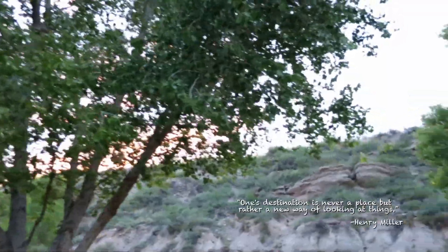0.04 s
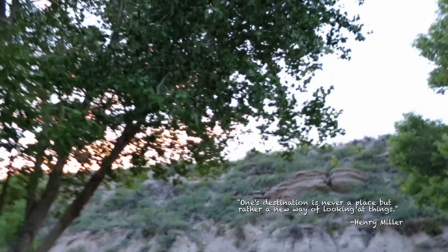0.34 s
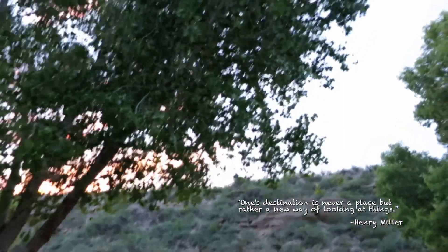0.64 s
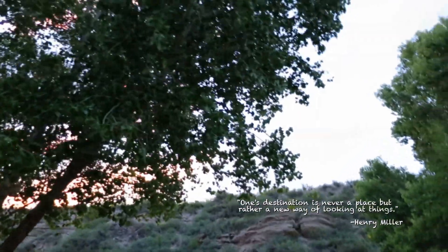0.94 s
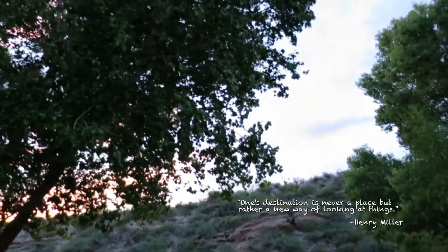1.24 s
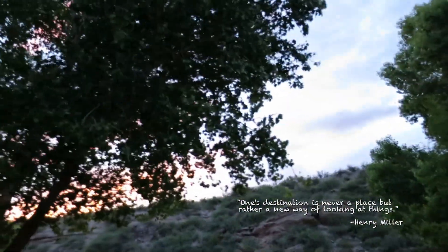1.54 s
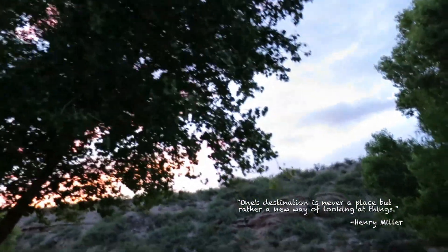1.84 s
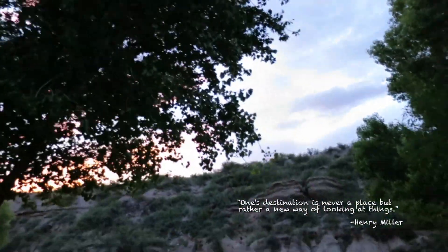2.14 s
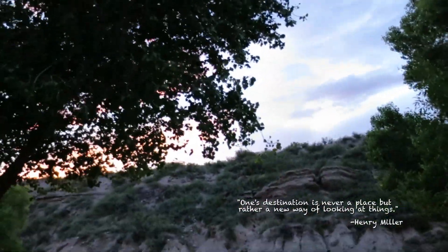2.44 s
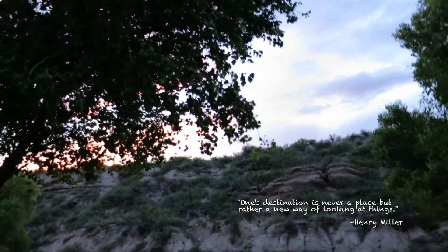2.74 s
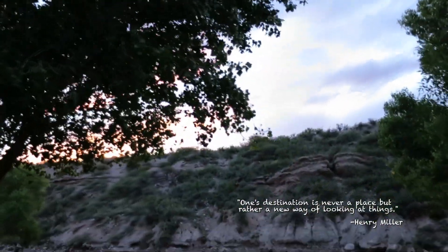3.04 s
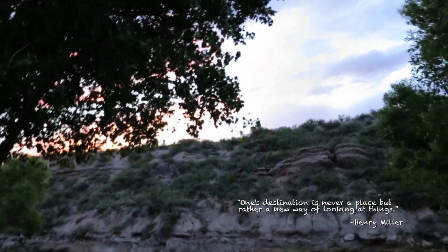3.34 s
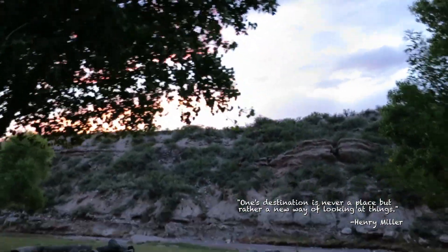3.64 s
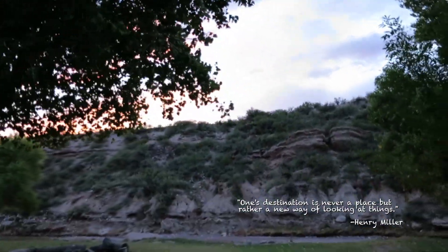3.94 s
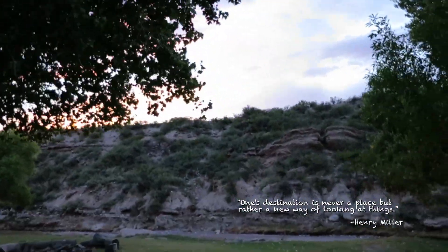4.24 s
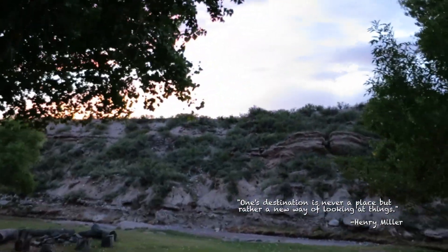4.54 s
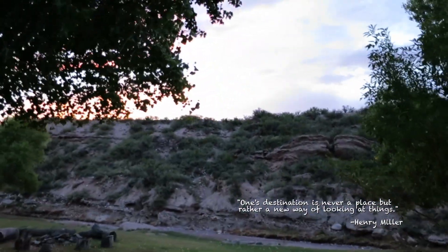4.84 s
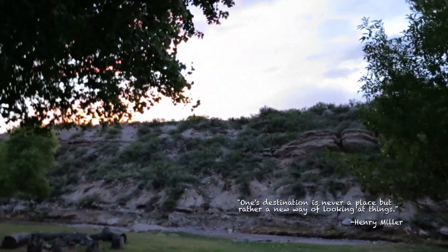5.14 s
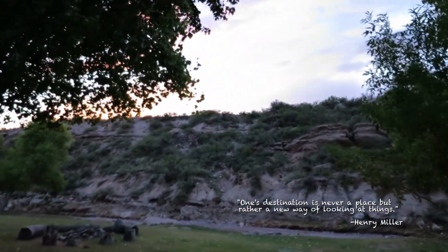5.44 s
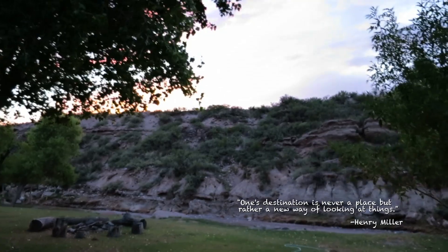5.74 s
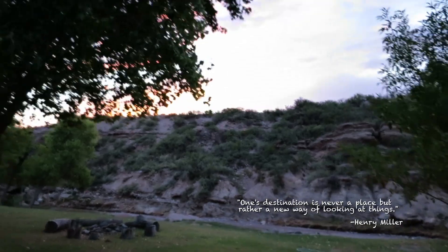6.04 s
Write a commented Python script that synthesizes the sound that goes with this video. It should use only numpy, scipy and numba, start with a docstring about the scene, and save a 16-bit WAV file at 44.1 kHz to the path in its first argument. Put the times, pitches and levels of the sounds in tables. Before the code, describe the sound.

Gusts of wind buffet the microphone over a steady hiss of leaves and distant water, with small handling clicks and rubs.

```python
"""Gusts on a hand-held camera by a creek.

Cottonwood leaves and distant water hiss at dusk. Gusts buffet the two microphone ports;
the strongest makes the limiter duck everything for most of a second and latches the wind filter,
so later gusts are thinner and central. Fingers shift on the plastic case: clicks, rubs, one squeak."""
import sys
import numpy as np
from scipy import signal
from scipy.fft import rfft, irfft
from scipy.io import wavfile
from scipy.ndimage import uniform_filter1d, minimum_filter1d
from numba import njit

SR = 44100
rng = np.random.default_rng(int(sys.argv[2]) if len(sys.argv) > 2 else 0)


def log_audio(samples):
    """Write samples as a 16-bit WAV file to the path given in sys.argv[1]."""
    # one column per channel
    frames = np.atleast_2d(samples).T
    # limit to full scale, then quantise
    limited = np.clip(frames, -1, 1)
    pcm = np.round(limited * 32767).astype(np.int16)
    wavfile.write(sys.argv[1], SR, pcm)


N = 277830
TIME_S = np.arange(N) / SR

# Big eddies: start_s, length_s, peak_db, centre_hz
BUFFETS = [(1.149, 0.017, -35, 110), (1.311, 0.02, -23, 102), (1.382, 0.019, -18.5, 105),
           (1.418, .016, -15, 99), (1.492, .008, -22, 115), (1.535, .018, -22.5, 100),
           (1.595, 0.0089, -18, 115), (1.636, 0.011, -18, 100), (2.91, 0.038, -26, 88.5),
           (3.118, 0.005, -8.5, 174), (3.153, 0.023, -13.5, 233), (3.218, 0.0047, -17, 150),
           (3.292, 0.0045, -14, 159), (3.387, 0.012, -21, 100), (3.513, 0.027, -6.5, 116),
           (3.55, 0.0093, -3, 110), (3.562, 0.0068, -1, 101), (3.573, 0.0031, 4.5, 184),
           (3.74, 0.0064, -8.5, 150), (3.753, .016, -7.5, 131), (3.773, 0.005, 2.5, 170),
           (3.807, 0.004, -13.5, 150), (3.847, 0.0071, -12.5, 110), (3.873, 0.0052, -10, 199),
           (3.892, 0.019, -10, 149), (3.924, 0.0028, 9, 269), (3.93, 0.0074, -4, 654),
           (3.935, .034, 0.5, 235), (4.106, 0.031, -9.5, 273), (4.158, .003, -4.5, 486),
           (4.171, 0.0066, -9, 268), (4.191, 0.0072, -8, 250), (4.291, 0.013, -9.5, 235),
           (4.313, .013, 2, 428), (4.324, 0.013, 1, 755), (4.338, 0.0095, -2.5, 230),
           (4.372, 0.02, -11, 238), (4.414, 0.0045, -6.5, 192), (4.465, 0.0066, -8.5, 210),
           (4.479, 0.012, -7, 298), (4.501, 0.018, -10.5, 200), (4.542, 0.017, -12, 240),
           (4.609, 0.015, -24, 148), (4.749, 0.013, -26, 148), (4.786, 0.0095, -20, 178),
           (4.81, 0.014, -12, 235), (4.842, 0.011, -19.5, 256), (4.936, 0.012, -19.5, 150),
           (4.986, 0.02, -22, 182), (5.137, 0.013, -19.5, 140), (5.226, .006, -8, 201),
           (5.248, .018, -10, 255), (5.281, 0.025, -13, 263), (5.36, 0.0044, -9, 241),
           (5.386, 0.0077, -15.5, 200), (5.441, .007, -16.5, 150), (5.523, 0.0051, -13, 240),
           (5.544, .017, -13.5, 205), (5.702, 0.023, -14, 151), (5.773, .021, -22.5, 140),
           (5.853, 0.016, -17, 161), (5.89, .014, -22, 169), (6.015, 0.005, -16.5, 175),
           (6.04, 0.019, -25, 200), (6.099, 0.0039, -17.5, 210), (6.266, 0.0065, -7, 228)]
# Gusts at the ports: start_s, length_s, rumble_db, swirl_db, swirl_centre_hz
GUSTS = [(1.11, 0.072, -41, -45, 110), (1.34, 0.32, -37, -38.5, 105), (1.81, 0.88, -48, -55.5, 110),
         (2.855, 0.35, -38.5, -49, 110), (3.104, 0.32, -37.5, -48, 110), (3.53, 0.06, -23.5, -25, 110),
         (3.657, 0.32, -27, -26.5, 100), (4.14, 0.05, -40, -30, 224), (4.29, 0.24, -31.5, -32.5, 240),
         (4.791, .24, -37.5, -38, 207), (5.216, 0.17, -40, -32, 260), (5.5, 0.27, -34.5, -53, 170),
         (6.027, 0.34, -40, -38, 201)]
# One eddy: ratio_to_centre, gain_db
EDDY_SPECTRUM = [(.1, -20), (.3, -10), (.55, -2.5), (1, 0), (1.6, -9), (3, -26.5), (6, -43), (20, -49)]
# Damping by the port mesh: freq_hz, gain_db
MESH_RESPONSE = [(300, 4), (1500, 2), (2200, -14), (6000, -24)]
# Airflow rumble: freq_hz, gain_db
RUMBLE_SPECTRUM = [(20, -19), (45, 2.5), (85, 2.5), (140, -7.5), (220, -11), (330, -11), (500, -23),
                   (900, -25), (2500, -44)]
# Plastic parts slipping: start_s, peak_db, ring_hz, t60_s, left_minus_right_db
CLICKS = [(0.2572, -23, 810, 0.017, 0), (0.3878, -26.5, 890, 0.0062, 0), (0.5578, -17, 1640, 0.0017, -15),
          (.852, -29, 1600, 0.014, 0), (1.1756, -24.5, 2210, 0.018, 1), (1.222, -28, 1250, .012, 0),
          (1.4, -23, 1700, 0.0017, 5), (1.441, -15.5, 1420, 0.0027, -1), (1.5088, -19, 1730, 0.0055, -1),
          (1.529, -16.5, 1680, 0.0026, 0), (1.7938, -19.5, 620, 0.0026, 0), (1.839, -28, 1080, 0.017, 2),
          (1.94, -31, 1360, .008, 1), (2.3056, -9, 2010, 0.0013, -22), (2.3058, -9.5, 4770, 0.00094, 6),
          (2.539, -6.5, 1700, 0.0029, -1.5), (2.5695, -10, 1740, 0.0015, 0),
          (2.5751, -11, 1700, 0.0032, -1), (2.74, -28, 1110, 0.0086, 0), (2.971, -31, 700, 0.045, 0),
          (3.3563, -17.5, 2070, 0.00072, -1), (3.453, -26, 1330, .005, -8),
          (3.4615, -18.5, 1500, 0.0011, -14), (4.648, -17.5, 1340, 0.001, -4),
          (5.1739, -15.5, 2270, 0.0018, -2), (5.216, -24.5, 1150, 0.0061, 0), (6.146, -32.5, 890, 0.014, 0),
          (6.1727, -26, 1560, 0.015, 7), (6.239, -19.5, 1530, 0.0026, 0), (6.294, -18, 1980, 0.0024, 0)]
# Skin sliding on the case: start_s, length_s, level_db, left_minus_right_db
RUBS = [(0.576, 0.079, -39, -12), (1.828, 0.013, -34.5, -1), (2.284, 0.011, -34, -6),
        (2.352, 0.018, -34, -8), (2.376, 0.034, -29.5, -13), (2.413, 0.03, -38, -8),
        (3.056, 0.091, -38, -23), (3.086, 0.011, -41, -10), (3.151, 0.036, -30.5, -13),
        (3.19, 0.038, -32.5, -13), (3.29, 0.043, -35.5, -2), (3.419, 0.014, -33.5, -3),
        (3.47, 0.061, -36, -9), (3.739, 0.032, -28.5, -8), (4.353, 0.055, -34, -8),
        (4.417, 0.059, -30.5, -8), (4.481, 0.026, -37, -8), (4.792, 0.028, -33, -2),
        (4.865, 0.044, -40, -1), (5.19, 0.015, -43, 1), (5.212, .042, -40, -4), (5.325, 0.019, -37.5, -1),
        (5.383, .02, -35, -1), (5.461, 0.014, -41, 0), (5.508, 0.012, -34, 4), (6.176, 0.049, -42, 0)]
# Case resonances: freq_hz, gain_db
CASE_RESPONSE = [(150, -5), (500, -1), (1050, 6.5), (1400, 5), (2020, 7.5), (2380, -1.5), (3300, -2),
                 (4400, -12), (7000, -27), (14000, -54)]
# Dry ticks: start_s, peak_db
TICKS = [(1.173, -17.5), (2.425, -18.5), (2.547, -19), (3.691, -22.5), (4.699, -25)]
# Fingertip squeak: time_s, pitch_hz, level_db
SQUEAK_TRACK = [(1.645, 229, -60), (1.656, 291, -31.5), (1.672, 385, -30.5), (1.679, 527, -49),
                (1.684, 690, -31.5), (1.699, 755, -30.5), (1.704, 900, -60)]
# Leaves and creek, common to both ports: freq_hz, gain_db
HISS_MID_SPECTRUM = [(18, -38), (30, -5), (59, -3.5), (148, 1.5), (177, -3.5), (208, -1), (455, -1),
                     (830, -3), (996, -3.5), (1110, -3), (1260, -3.5), (3780, -4.5), (8500, -10.5),
                     (13300, -9.5), (15500, -21.5)]
# Leaves and creek, opposed between ports: freq_hz, gain_db
HISS_SIDE_SPECTRUM = [(18, -46), (30, -38), (81, -23), (180, -2), (467, 0.5), (561, -2), (787, -5),
                      (1020, -4.5), (1230, -4.5), (1680, -10.5), (2360, -14), (3590, -7), (12900, -5),
                      (15500, -6)]
# Hiss level, with an added dip as the limiter ducks after the big gust: time_s, level_db
HISS_LEVEL = [(0, -37), (1, -37.5), (2, -38.5), (3.4, -38), (4.05, -44.5), (4.3, -42), (4.6, -41),
              (4.95, -42.5), (5.25, -39), (5.7, -40), (6.3, -40.5)]


def buffets(width_ratio=0.44, ragged_db=2.5, size=8192):
    """Each big eddy sweeps a short, ragged pressure push across the ports."""
    out, t = np.zeros((2, N)), (np.arange(size) - size / 2) / SR
    knots_s = np.linspace(t[0], t[-1], size // 256)
    for start_s, length_s, peak_db, centre_hz in BUFFETS:
        flutter = undb(ragged_db * np.interp(t, knots_s, rng.standard_normal(len(knots_s))))
        bell = np.exp(-.5 * (t / (width_ratio * length_s)) ** 2)
        push = rng.standard_normal((2, size)) * flutter * bell
        push = colour(colour(push, EDDY_SPECTRUM, centre_hz), MESH_RESPONSE)
        push = across_ports(np.array([unit(row) for row in push]))
        add(out, start_s + length_s / 2 + t[0], push / abs(push).max() * undb(peak_db))
    return out


def wind_rumble(churn_db=0.5, churn_hz=32, lull_db=-61.5):
    """Turbulence at the ports, rising with each gust."""
    rumble = colour(across_ports(rng.standard_normal((2, N)), stray_db=-5.5), RUMBLE_SPECTRUM)
    gusts = sum(gust_envelope(start_s, length_s) * undb(db) for start_s, length_s, db, _, _ in GUSTS)
    return unit(rumble * undb(churn_db * walk(churn_hz))) * (undb(lull_db) + gusts)


def swirl(eddies_per_s=65.0, flutter_db=4.5):
    """Small eddies in each gust sputter against the mesh."""
    air = colour(across_ports(rng.standard_normal((2, N))), MESH_RESPONSE)
    flutter = undb(flutter_db * np.minimum(walk(eddies_per_s), .5))
    out = np.zeros((2, N))
    for start_s, length_s, _, level_db, centre_hz in GUSTS:
        eddies = unit(colour(air, EDDY_SPECTRUM, centre_hz) * flutter)
        out += eddies * gust_envelope(start_s, length_s) * undb(level_db)
    return out


def gust_envelope(start_s, length_s, attack_s=0.031, release_s=0.036):
    """Exponential rise, hold, exponential fall."""
    t = TIME_S - start_s
    return np.exp(np.minimum(t, 0) / attack_s - np.maximum(t - length_s, 0) / release_s)


def across_ports(pair, stray_db=-12.0, max_lag_rad=2.404, corner_hz=69):
    """Air meets the right port, then the left: one push out of phase, plus stray turbulence."""
    size = pair.shape[-1]
    lag_rad = max_lag_rad * (1 - np.exp(-np.fft.rfftfreq(size, 1 / SR) / corner_hz))
    turn = np.exp(.5j * np.array([-lag_rad, lag_rad]))
    return irfft(rfft(pair[0]) * turn + undb(stray_db) * rfft(pair[1]) * turn.conj(), size)


def case_clicks(contact_s=0.00076, body_db=-22.0, body_t60_s=0.093, size=2048):
    """A slip kicks the case: one part rings briefly, then the whole body dies away."""
    out, t = np.zeros((2, N)), np.arange(size) / SR
    for start_s, peak_db, ring_hz, t60_s, pan_db in CLICKS:
        onset = 1 - np.exp(-(t / contact_s) ** 2)
        envelope = onset * decay(t, t60_s)
        ring = np.sin(2 * np.pi * ring_hz * t) * envelope / envelope.max()
        body = unit(colour(rng.standard_normal(size), CASE_RESPONSE)) * onset * decay(t, body_t60_s)
        add(out, start_s, (ring + undb(body_db) * body) * undb(peak_db) * pan(pan_db))
    return out


def finger_rubs(slips_per_s=4500.0, rough_db=3.0, rough_hz=260, edge_s=0.023):
    """Skin sticks and slips in tiny uneven steps that excite the case."""
    slips = rng.standard_normal((2, N)) * (rng.random(N) < slips_per_s / SR)
    scrape = colour(mid_side(slips, side_db=-4.5), CASE_RESPONSE)
    scrape = unit(scrape * undb(rough_db * walk(rough_hz)))
    strokes = sum(swell(start_s, length_s, edge_s) * undb(level_db) * pan(pan_db)
                  for start_s, length_s, level_db, pan_db in RUBS)
    return scrape * strokes


def dry_ticks(t60_s=0.015, corner_hz=5500.0, size=2048):
    """Tiny treble bursts that die at once."""
    out, t = np.zeros((2, N)), np.arange(size) / SR
    for start_s, peak_db in TICKS:
        treble = colour(rng.standard_normal((2, size)), [(corner_hz / 2, -18), (corner_hz, 0)])
        tick = mid_side(treble * decay(t, t60_s), side_db=-1.5)
        add(out, start_s, tick / abs(tick).max() * undb(peak_db))
    return out


def finger_squeak():
    """Stick-slip speeds up as a fingertip lets go."""
    time_s, pitch_hz, level_db = np.transpose(SQUEAK_TRACK)
    cycles = np.cumsum(np.interp(TIME_S, time_s, pitch_hz)) / SR
    return np.sin(2 * np.pi * cycles) * np.interp(TIME_S, time_s, undb(level_db), left=0, right=0)


def grip(slips_per_s=32.0, level_db=-55.5, scatter_db=2.5):
    """The restless hand makes faint random ticks in the case."""
    slips = (rng.random(N) < slips_per_s / SR) * undb(scatter_db * rng.standard_normal(N))
    return unit(colour(slips, CASE_RESPONSE)) * undb(level_db)


def leaves_and_creek(flutter_db=1.23, flutter_hz=21.874, grain=0.43):
    """Countless leaf taps and splashes merge into hiss; each octave flutters on its own."""
    taps = rng.standard_normal((2, N)) * np.exp(grain * rng.standard_normal((2, N)))
    spectrum = rfft(taps)
    octave = np.log2(np.clip(np.fft.rfftfreq(N, 1 / SR), 125, 16000) / 125)
    common_db = 0.2 * walk(rate_hz=7.64)
    hiss = np.zeros((2, N))
    for k in range(8):
        band = irfft(spectrum * np.maximum(1 - abs(octave - k), 0), N)
        hiss += band * undb(flutter_db * walk(flutter_hz) + common_db)
    mid = unit(colour(hiss[0], HISS_MID_SPECTRUM))
    side = unit(colour(hiss[1], HISS_SIDE_SPECTRUM))
    level_db = np.interp(TIME_S, *np.transpose(HISS_LEVEL))
    return mid_side([mid, side], side_db=-1.5) * pan(0.5) * undb(level_db)


def undb(db):
    """Decibels to gain."""
    return 10 ** (np.asarray(db) / 20)


def unit(x):
    """Scale to rms 1."""
    return x / np.sqrt(np.mean(x ** 2))


def decay(t, t60_s):
    """Fall of 60 dB per t60_s."""
    return np.exp(-np.log(1000) * t / t60_s)


def colour(x, outline, freq_scale=1):
    """Filter by (freq_hz, gain_db) rows, frequencies scaled."""
    freq_hz, gain_db = np.transpose(outline)
    bins_hz = np.maximum(np.fft.rfftfreq(x.shape[-1], 1 / SR), 1)
    gain = undb(np.interp(np.log(bins_hz), np.log(freq_hz * freq_scale), gain_db))
    return irfft(rfft(x) * gain, x.shape[-1])


def walk(rate_hz):
    """Random steps, smoothed twice; rms 1."""
    hold = int(SR / rate_hz)
    steps = np.repeat(rng.standard_normal(N // hold + 1), hold)
    return unit(uniform_filter1d(uniform_filter1d(steps, hold), hold)[:N])


def pan(left_minus_right_db):
    """Constant-power stereo gains."""
    return unit(undb(np.array([[.5], [-.5]]) * left_minus_right_db))


def mid_side(pair, side_db=0):
    """Mid and side to left and right."""
    side = undb(side_db) * pair[1]
    return np.array([pair[0] + side, pair[0] - side])


def add(out, start_s, sound):
    """Mix in a stereo sound."""
    start = int(start_s * SR)
    part = sound[:, :max(N - start, 0)]
    out[:, start:start + part.shape[1]] += part


def swell(start_s, length_s, edge_s):
    """Gate with rounded edges."""
    rise = np.clip((TIME_S - start_s) / edge_s + .5, 0, 1)
    fall = np.clip((start_s + length_s - TIME_S) / edge_s + .5, 0, 1)
    return np.sin(np.pi / 2 * rise * fall) ** 2


@njit
def limiter_cut_db(over_db, recover_db_per_s):
    """Gain reduction: instant attack, steady recovery."""
    cut_db, held_db = np.empty(len(over_db)), 0.
    for i in range(len(over_db)):
        held_db = max(held_db - recover_db_per_s / SR, over_db[i], 0.)
        cut_db[i] = held_db
    return cut_db


def wind_filter(x, gain_db, trip_db=-8.5, open_hz=20.0, mid_hz=88.0, side_hz=1620.0,
                mid_glide_s=0.45, side_hz_per_s=2000.0):
    """Deep limiting latches a rising high-pass: bass thins and folds to mono."""
    latched_s = np.cumsum(np.maximum.accumulate(gain_db < trip_db)) / SR
    mid_corner_hz = open_hz * (mid_hz / open_hz) ** np.minimum(latched_s / mid_glide_s, 1)
    side_corner_hz = np.minimum(open_hz + side_hz_per_s * latched_s, side_hz)
    mid = zero_phase_high_pass((x[0] + x[1]) / 2, mid_corner_hz)
    side = zero_phase_high_pass((x[0] - x[1]) / 2, side_corner_hz)
    return mid_side([mid, side])


def zero_phase_high_pass(x, corner_hz):
    """Forwards, then backwards: the image stays centred."""
    forward = high_pass(x, corner_hz)
    return high_pass(forward[::-1].copy(), corner_hz[::-1].copy())[::-1]


@njit
def high_pass(x, corner_hz):
    """One pole, moving corner."""
    y, low = np.empty(len(x)), 0.
    for i in range(len(x)):
        g = np.tan(np.pi * corner_hz[i] / SR)
        step = (x[i] - low) * g / (1 + g)
        y[i] = x[i] - low - step
        low += 2 * step
    return y


def scene():
    """Open air, no echo: far hiss plus all that touches the camera."""
    hiss = leaves_and_creek()
    wind = wind_rumble() + swirl() + buffets()
    handling = finger_rubs() + case_clicks() + dry_ticks() + grip() + finger_squeak()
    return wind + handling + hiss


def record(dry, ceiling_db=-1.0, recover_db_per_s=13.5, top_hz=15600):
    """Camera chain: limiter, wind filter, low-pass."""
    over_db = 20 * np.log10(abs(dry).max(axis=0) + 1e-9) - ceiling_db
    gain_db = -limiter_cut_db(over_db, recover_db_per_s)
    gain_db = uniform_filter1d(minimum_filter1d(gain_db, size=89), size=89)  # 2 ms look-ahead
    thinned = wind_filter(dry * undb(gain_db), gain_db)
    return signal.sosfilt(signal.ellip(8, .2, 70, top_hz, fs=SR, output="sos"), thinned)


dry = scene()
out = record(dry)
log_audio(out)
```